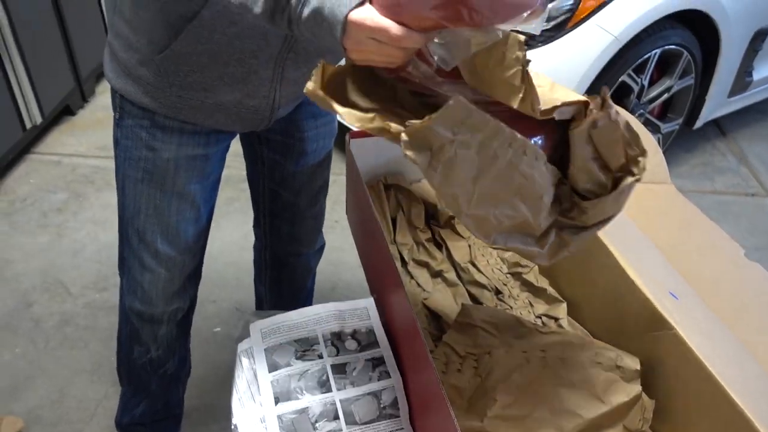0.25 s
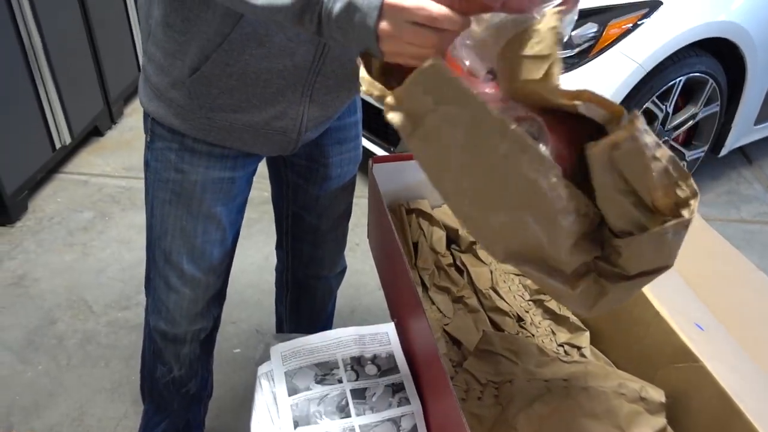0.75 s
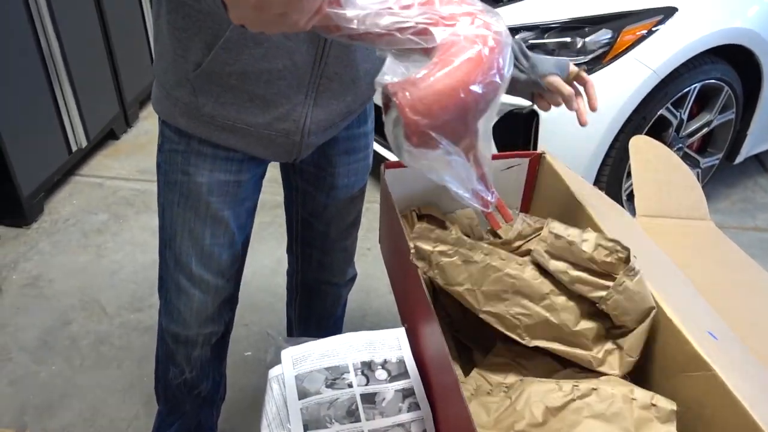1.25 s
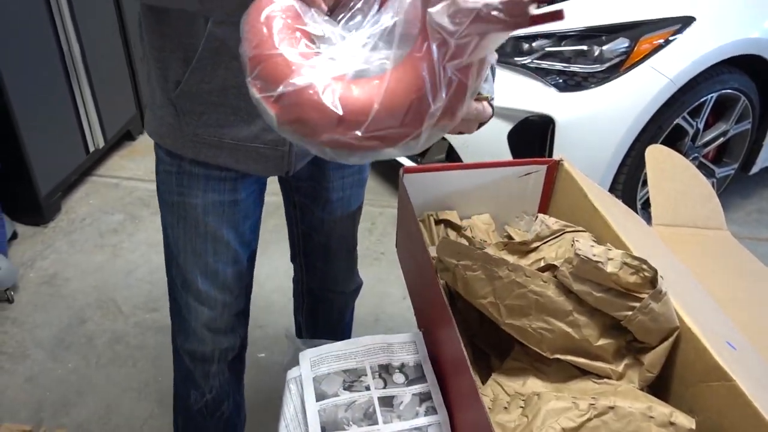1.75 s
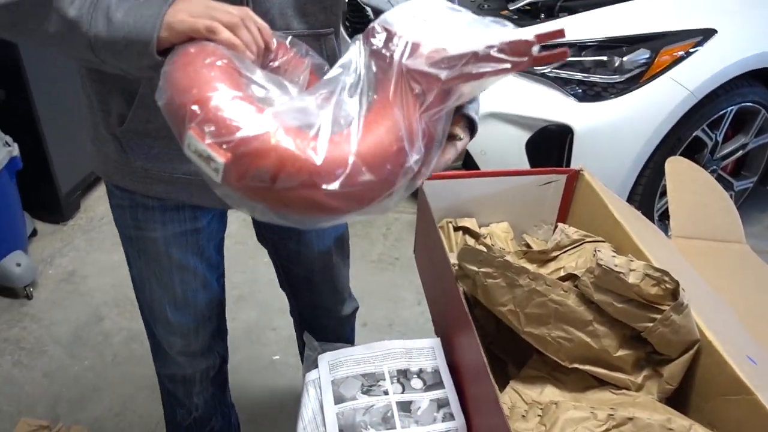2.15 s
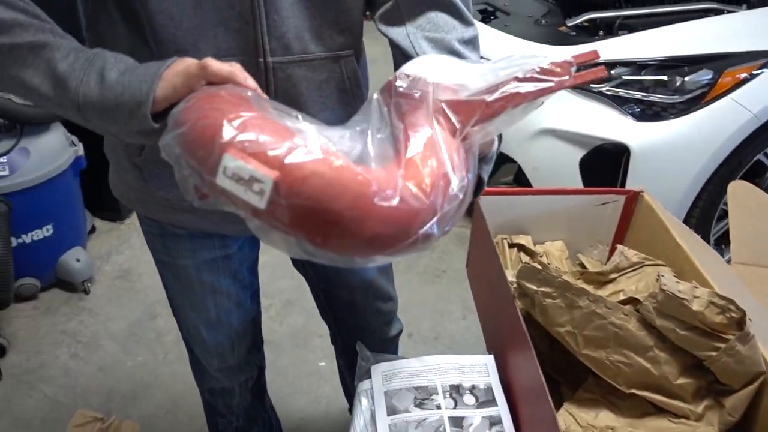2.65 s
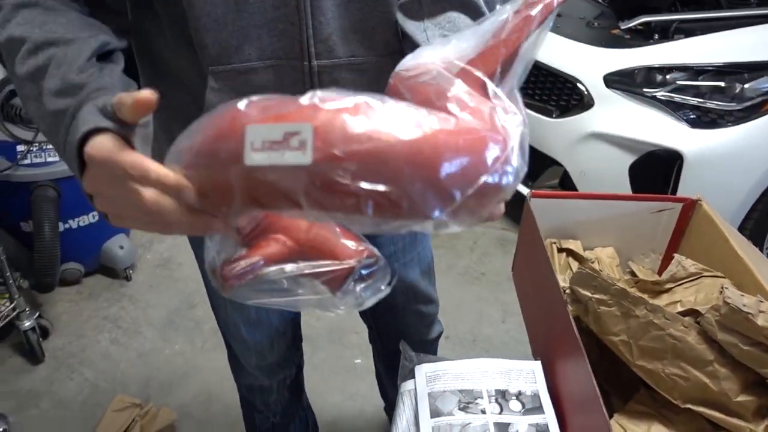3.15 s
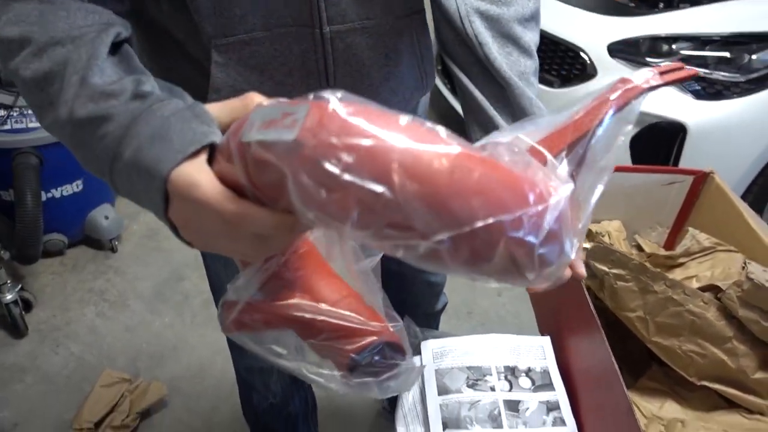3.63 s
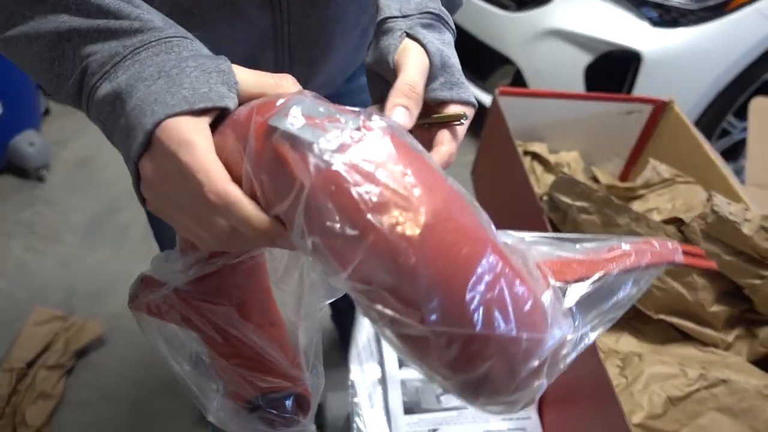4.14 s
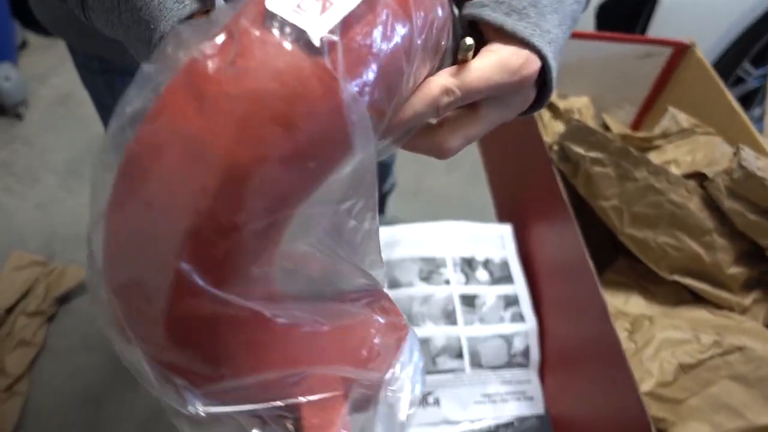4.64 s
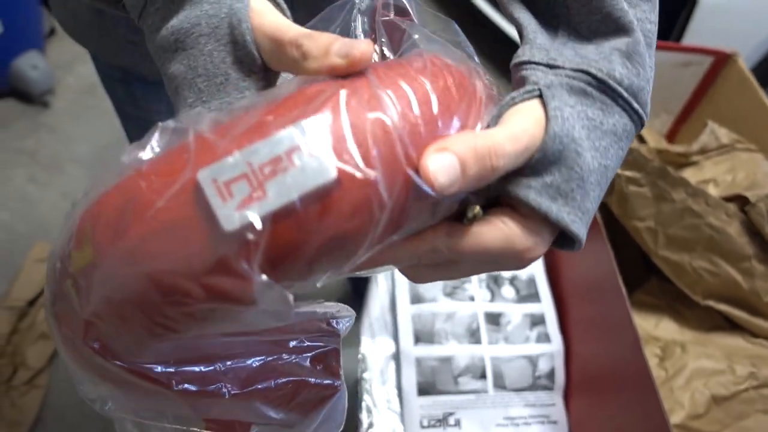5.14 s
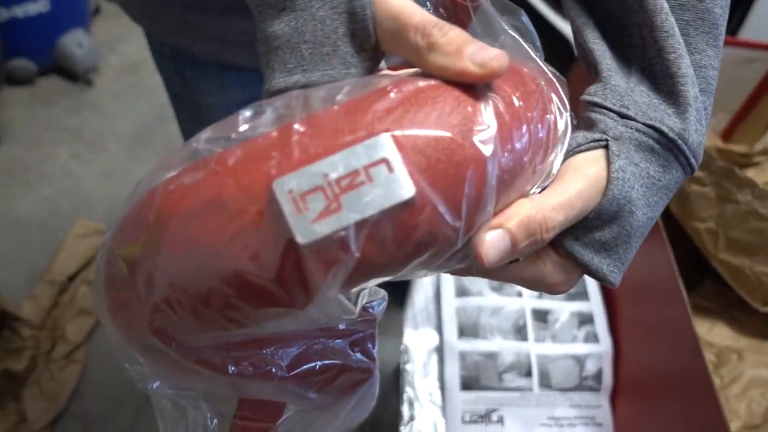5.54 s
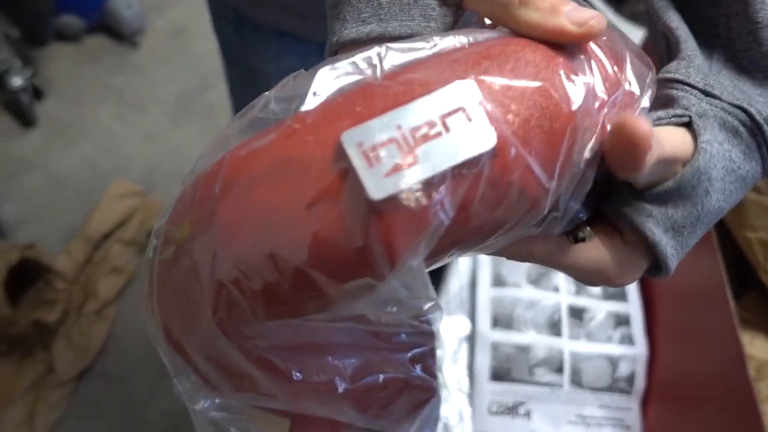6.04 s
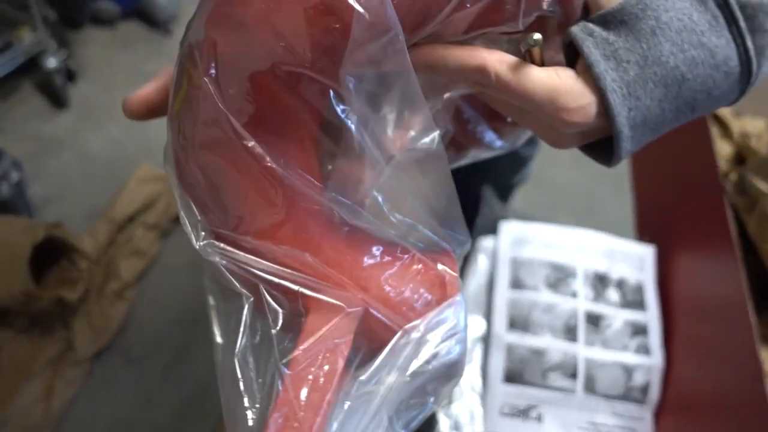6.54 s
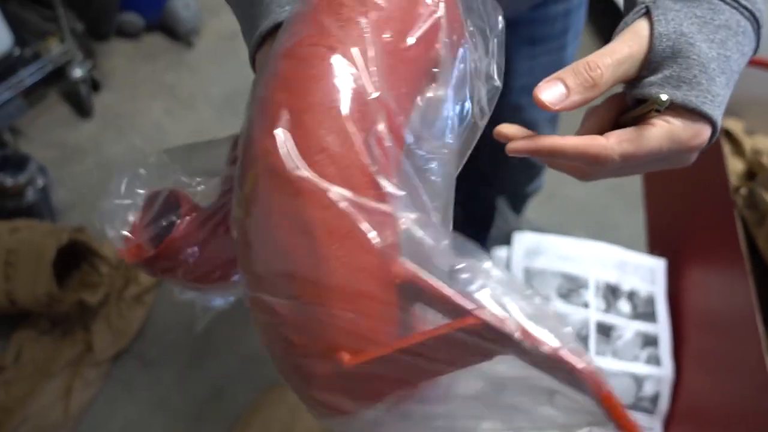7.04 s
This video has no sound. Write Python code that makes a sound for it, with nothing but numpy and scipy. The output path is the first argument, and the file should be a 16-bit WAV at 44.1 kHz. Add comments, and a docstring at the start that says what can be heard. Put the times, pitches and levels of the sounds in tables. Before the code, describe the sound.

Thick packing paper rustles loudly and drops into a cardboard box, then a thin plastic bag crinkles in bursts around a hollow pipe in a garage.

```python
"""In a concrete garage a hollow pipe in a plastic bag is pulled out of crumpled packing paper: creases buckle as short
resonant noise bursts over a dense crackle of random grains, and sheets slide as fluttering noise. The paper drops into
a cardboard box with soft thumps, pulses that ring a dull resonance. Then hands turn the bag over, with brighter snaps
and a few knocks of the pipe in the palm. Decaying noise echoes it all, and an appliance hums far off as narrow-band
noise in still air. Two close microphone ports hear it with small delays and a treble that differs between them."""
import sys
import numpy as np
from scipy import signal
from scipy.fft import rfft, irfft, next_fast_len
from scipy.io import wavfile

SR = 44100
rng = np.random.default_rng(int(sys.argv[2]) if len(sys.argv) > 2 else 0)


def volts_from_db(level):
    """Convert decibel levels to linear amplitude ratios."""
    exponent = np.asarray(level, float) / 20
    return 10 ** exponent


def dump_mix(stems):
    """Bounce the given channels to the path in sys.argv[1] as a 16-bit WAV at rate SR."""
    frames = np.atleast_2d(stems).T  # one column per channel
    limited = np.clip(frames, -1, 1)  # hard clip at full scale
    pcm = np.round(limited * 32767).astype(np.int16)
    wavfile.write(sys.argv[1], SR, pcm)


N = 321224

# spectrum of rustling sheets: f/Hz, relative density/dB per Hz
SHEET_SPECTRUM = [(50, -34), (110, -4.5), (330, -4.5), (570, -3.5), (900, -7.5), (2000, 2), (4200, 0),
                  (9000, -8), (16000, -8)]


def rms_one(x):
    """Normalisation: scale a signal to unit root mean square."""
    return x / np.sqrt(np.mean(x ** 2) + 1e-20)


def at_hz(points, hz):
    """Logarithmic pitch: read a spectrum table on a log-frequency axis."""
    p = np.array(points, float)
    return np.interp(np.log(hz + 1), np.log(p[:, 0] + 1), p[:, 1])


def colour(x, points):
    """Linear filtering: multiply the spectrum of steady noise by a spectrum table."""
    size = next_fast_len(N)
    gain = volts_from_db(at_hz(points, np.fft.rfftfreq(size, 1 / SR)))
    return irfft(rfft(x, size) * gain, size)[..., :N]


def resonate(x, hz, width_hz):
    """Damped resonance: a pole pair sets pitch and bandwidth, with gain about 1 at the peak."""
    r = np.exp(-np.pi * width_hz / SR)
    zeros = [(1 - r * r) / 2, 0, (r * r - 1) / 2]
    poles = [1, -2 * r * np.cos(2 * np.pi * hz / SR), r * r]
    return signal.lfilter(zeros, poles, x)


def dying(clicks, t60):
    """Exponential decay: each click starts an envelope that falls 60 dB in t60 seconds."""
    return signal.lfilter([1], [1, -volts_from_db(-60 / (max(t60, .001) * SR))], clicks + 1e-18)


def drift(rate_hz):
    """Low-passed chance: noise through two equal real poles at rate_hz, with unit rms."""
    r = np.exp(-40 * np.pi * rate_hz / SR)   # computed at every 20th sample
    slow = signal.lfilter([1], [1, -2 * r, r * r], rng.standard_normal(N // 20 + 2002))[2000:]
    return np.interp(np.arange(N) / 20, np.arange(len(slow)), rms_one(slow))


def ports(x, lag):
    """Arrival-time difference: sound from one side reaches one port lag samples before the other."""
    at = np.arange(len(x))
    return np.array([np.interp(at - lag / 2, at, x), np.interp(at + lag / 2, at, x)])


def diffuse(mid, side):
    """Diffuse-field coherence: the ports agree in the bass and part in the treble."""
    # difference of the two ports: f/Hz, side over mid/dB
    port_split = [(60, -35), (130, -33), (250, -22.5), (1000, -9.5), (4000, -2), (12000, -0.3)]
    side = colour(side, port_split)
    return np.array([mid + side, mid - side])


def handling():
    """Radiation of moved sheets: crackle and rub; slack paper booms in hollows, taut film is bright."""
    # treble of the sheet as it is held more or less taut: t/s, treble over rustle/dB
    taut = [(0.0, -5.5), (0.49, -5), (0.72, -7), (0.89, 0.5), (1.3, -0.5), (1.59, -6.5), (2.1, 2),
            (2.6, 0.5), (2.84, -4), (2.93, 5), (3.32, 3), (3.68, -5), (4.4, 0), (4.78, 0.5), (5.3, -3),
            (5.64, -1.5), (6.09, 1), (6.6, -0.5), (7.28, 0)]
    # air resonances of pipe and box: f/Hz, bandwidth/Hz, gain/dB
    hollows = [(246, 20, -4.5), (572, 88, -4), (1150, 450, -32)]
    # peaks of the four overlapping bands low, body, crisp and high: natural log of f/Hz
    band_pitches = np.log([700, 1700, 4500, 8000])
    slide_db = -4.0   # rubbing relative to crackle
    effort_db, boom_db, body_db = moves()
    taut_db = np.interp(np.arange(N) / SR, *np.transpose(taut))
    surge = yielding()
    sheet = crackle(effort_db, surge) + volts_from_db(slide_db) * slide(surge)

    size = next_fast_len(N)
    pitch = np.log(np.fft.rfftfreq(size, 1 / SR) + 1)
    spectrum = rfft(sheet, size)
    low, body, crisp, high = [irfft(spectrum * np.interp(pitch, band_pitches, share), size)[:, :N]
                              for share in np.eye(4)]
    low = low + sum(volts_from_db(db) * resonate(low, hz, width_hz) for hz, width_hz, db in hollows)

    rustle = rms_one(volts_from_db(body_db) * body + crisp)
    boom = volts_from_db(boom_db) * rms_one(low)
    treble = volts_from_db(taut_db) * rms_one(high)
    return volts_from_db(effort_db) * (rustle + boom + treble)


def moves():
    """Incoherent addition: movements add in power, so the strongest one sets the colour."""
    # hand movements that swell and fade, first in the paper, then on the bag:
    # t/s of the peak, rustle level/dB, rise/s per 20 dB, fade/s per 20 dB, boom over rustle/dB
    # (rise and fade are floored at 0.003 and 0.01 s)
    paper_moves = [(0.047, -26.5, -1, 0.14, -5.5), (0.19, -29.5, 0.8, 0.28, -5),
                   (0.214, -22.5, -0.03, 0.15, -4.5), (0.489, -28, .004, .2, -3.5),
                   (0.555, -28, -0.04, 0.24, -7), (0.6, -24.5, -0.04, 0.15, -2),
                   (0.68, -26, 0.02, 0.19, -5), (0.77, -29.5, 0.4, 0.31, -9), (0.85, -27, 0.03, .2, -4.5),
                   (0.92, -25.5, 0.21, 0.2956, -3.5), (1.165, -27, 0.07, 0.32, -2),
                   (1.41, -34.5, 0.5, 0.1142, -2.5), (1.54, -45, 0.5, -0.35, -1.5)]
    bag_moves = [(1.69, -55.5, .12, 0.37, 4), (1.854, -50, 0.18, .6, -3.5), (2.065, -48, 0.81, 0.11, -11),
                 (2.28, -46, 0.25, 0.19, -10), (2.405, -49.5, 0.073, 0.25, -7.5),
                 (2.538, -44.5, 0.079, 0.45, -12), (2.622, -39.5, 0.1, 0.16, -4.5),
                 (3.047, -37, .22, 0.43, -8.5), (3.195, -43, 0.44, 0.1, -7.5),
                 (3.375, -35, 0.14, 0.36, -10.5), (3.62, -49, 0.57, 0.23, -8),
                 (3.863, -50.5, 0.016, 0.035, -2.5), (4.152, -49, 0.0061, 0.082, -10),
                 (4.274, -54.5, 0.021, .45, 3.5), (4.42, -40, 0.15, 0.35, -12),
                 (4.564, -38.5, 0.29, 0.14, -9), (4.787, -36, 0.13, 0.28, -6.5),
                 (5.101, -40, 0.45, .3, -11.5), (5.339, -49, 0.82, 0.51, -5),
                 (5.572, -38.5, 0.16, 0.25, -8), (5.956, -58, .005, 0.059, -6),
                 (6.078, -37.5, 0.049, 0.087, -14), (6.15, -46, 0.083, 0.66, -8.5),
                 (6.29, -45.5, 0.32, .4, -7), (6.436, -33.5, 0.0087, 0.079, -1.5),
                 (6.51, -34.5, 0.13, 0.14, -9), (6.607, -34.5, 0.075, 0.37, -5),
                 (6.713, -33.5, 0.42, .3, -11.5), (6.81, -32.5, .35, 0.15, -11),
                 (7.041, -61, 0.24, 0.023, -33), (7.161, -51.5, 0.32, 0.92, -8.5)]
    paper_body_db, bag_body_db = 0.5, -2.5   # low-middle rustle: thick paper has more than thin film
    t = np.arange(0, N + 32, 32) / SR
    power, boom, body = 1e-12, 0, 0
    for rows, body_db in ((paper_moves, paper_body_db), (bag_moves, bag_body_db)):
        for s, db, rise, fade, boom_db in rows:
            fall_db = 20 * np.maximum((s - t) / max(rise, .003), (t - s) / max(fade, .01))
            part = volts_from_db(db - fall_db) ** 2
            power = power + part
            boom = boom + part * boom_db
            body = body + part * body_db
    curves = (10 * np.log10(power), boom / power, body / power)
    return [np.interp(np.arange(N) / SR, t, c) for c in curves]


def yielding():
    """Stick and release: folds give way suddenly and settle slowly; unit rms."""
    gives_per_s, settle_s = 35.0, .12
    gives = (rng.random(N) < gives_per_s / SR) * np.minimum(rng.exponential(1, N), 2)
    return rms_one(dying(gives, settle_s))


def crackle(effort_db, surge):
    """Random impulse process: small creases buckle, fused under hard work and lone under light."""
    creases_per_s = 800.0   # at an effort of -41.5 dB, before the surges
    per_s = creases_per_s * volts_from_db(.6 * (effort_db + 41.5))
    # the square root keeps the power steady as the creases grow denser
    sizes = volts_from_db(4.6 * np.minimum(rng.exponential(1, N), 2.5)) / np.sqrt(per_s)
    born = rng.random(N) < per_s * volts_from_db(3.5 * surge) / SR
    patch = rng.integers(0, 12, N)   # each patch of sheet has a pitch and a direction
    out = 0
    for k, hz in enumerate(np.geomspace(950, 13500, 12)):
        envelope = dying(sizes * born * (patch == k), .003 + 5 / hz)
        grains = envelope * rng.standard_normal(N)
        out = out + ports(resonate(grains, hz, .9 * hz), 1.3 * np.sin(k * 4))
    return rms_one(colour(out, SHEET_SPECTRUM))


def slide(surge):
    """Friction noise: sheets rub with a broad hiss whose level flutters."""
    mid, side = colour(rng.standard_normal((2, N)), SHEET_SPECTRUM)
    flutter_db = 1.6 * surge + 2.0 * drift(87.0)
    return rms_one(diffuse(mid, side) * volts_from_db(flutter_db))


def burst(noise, hz, t60, width=1.0):
    """Impulse excitation of a buckling crease: dying noise through two broad resonances, peak 1."""
    shape = noise * volts_from_db(-60 * np.arange(len(noise)) / (max(t60, .001) * SR))
    shape = resonate(shape, hz, width * hz)
    shape = resonate(shape, hz, 2 * width * hz)
    return shape / np.abs(shape).max()


def snaps():
    """Buckling instability: a sharp release, then a short rattle of the sheet; low ones rattle longer."""
    # creases that buckle audibly: t/s, peak level/dB before the ports, centre f/Hz
    buckles = [(0.008, -13, 3350), (0.021, -11, 2800), (0.0554, -9.5, 3800), (0.1606, -13.5, 3050),
               (0.1844, -18, 3150), (0.2099, -11, 2130), (0.2152, -11, 2630), (0.4892, -16, 3650),
               (0.5557, -14, 4350), (0.5999, -10.5, 2580), (0.628, -15.5, 2320), (0.669, -20.5, 2350),
               (0.6738, -14, 2030), (0.694, -13, 2570), (0.7289, -18, 2750), (0.7666, -17, 3150),
               (0.8392, -7.5, 5750), (0.8724, -17, 4450), (0.9363, -11, 5100), (0.9552, -8, 5550),
               (0.9684, -8, 5250), (1.001, -13, 5200), (1.6834, -26, 3300), (1.7311, -32, 3750),
               (1.8466, -22.5, 6600), (1.918, -19, 5700), (1.921, -18, 7750), (1.9692, -20, 6950),
               (1.9958, -21.5, 4950), (2.0032, -20, 3550), (2.0282, -17, 6950), (2.0525, -19, 5700),
               (2.124, -16.5, 6800), (2.1303, -19.5, 8700), (2.267, -24.5, 4330), (2.3182, -24.5, 4600),
               (2.5313, -25, 5150), (2.5664, -19, 6050), (2.6408, -20, 6900), (2.7, -26, 4450),
               (2.741, -30.5, 4650), (2.871, -26, 6250), (3.0181, -28.5, 6250), (3.1368, -16, 7550),
               (3.301, -19.5, 6350), (3.3562, -18.5, 6600), (3.4684, -15, 9450), (3.7665, -25.5, 4750),
               (3.8696, -30.5, 4100), (4.1522, -32, 3780), (4.3511, -27, 6300), (4.5335, -21, 5250),
               (4.5492, -16.5, 5100), (4.578, -19, 5450), (4.7484, -23, 4250), (4.7757, -12, 5500),
               (4.8328, -22, 4350), (4.8641, -20, 5850), (4.889, -14, 6460), (5.0028, -15, 5150),
               (5.0433, -22, 5050), (5.0763, -13, 5450), (5.099, -14, 6250), (5.1196, -15.5, 7600),
               (5.1373, -20, 7150), (5.146, -17, 4900), (5.177, -18, 7400), (5.216, -21, 7100),
               (5.2302, -19, 5950), (5.2676, -13, 7000), (5.285, -25, 2250), (5.3194, -20.5, 7600),
               (5.3958, -25, 6950), (5.4182, -25, 5350), (5.4313, -19, 10500), (5.4646, -24.5, 3650),
               (5.575, -14.5, 8650), (5.585, -13.5, 6500), (5.6154, -20.5, 4900), (5.6541, -19, 5650),
               (5.702, -22.5, 2770), (5.7128, -21, 8050), (5.787, -20, 6100), (5.8084, -32.5, 3450),
               (5.8841, -38, 4150), (5.9546, -34.5, 3200), (6.008, -35, 5370), (6.0404, -26.5, 3700),
               (6.0543, -25.5, 5450), (6.0642, -15, 6750), (6.1285, -16, 8250), (6.146, -13, 9250),
               (6.1536, -16, 5650), (6.1776, -21.5, 4950), (6.2576, -15.5, 6750), (6.283, -25, 6750),
               (6.2944, -19, 7350), (6.2978, -14, 5200), (6.3143, -7, 6400), (6.349, -19, 6050),
               (6.3835, -22.5, 4450), (6.4352, -16, 2650), (6.4484, -11, 5950), (6.5983, -6, 6100),
               (6.6215, -10.5, 7550), (6.6526, -12.5, 5000), (6.6733, -8.5, 7050), (6.695, -12, 4550),
               (6.7303, -8.5, 4680), (6.7428, -8, 4380), (6.7792, -20, 6150), (6.7865, -13, 4250),
               (6.8022, -13, 3330), (6.893, -16.5, 4460), (7.0022, -16.5, 5140), (7.0082, -27, 8450),
               (7.0434, -15, 3900), (7.0689, -8, 6270), (7.154, -28, 5450), (7.1922, -25.5, 5600),
               (7.2557, -40, 2950), (7.2784, -21.5, 7560)]
    out = np.zeros((2, N + 600))
    noise = rng.standard_normal((len(buckles), 601))
    for (s, db, hz), (side, *rattle) in zip(buckles, noise):
        release = np.arange(600) == 3
        strike = 0.42 * np.array(rattle) + 1.26 * release
        shape = burst(strike, hz, 0.006 + 8 / hz, width=1.1)
        # the body that holds the ports shades mainly the treble
        shade = .25 * np.tanh(side) * resonate(shape, 8000, 14000)
        heard = ports(shape, 0.88 * np.tanh(side)) + [shade, -shade]
        start = round(s * SR)
        out[:, start:start + 600] += volts_from_db(db) * heard
    return out[:, :N]


def thumps():
    """Forced oscillation: a soft 5 ms push rings a dull, heavily damped hollow."""
    # paper on the box, pipe in the palm: t/s, peak level/dB, f/Hz
    blows = [(0.496, -33, 269), (1.182, -24.5, 169), (1.337, -23.5, 205), (2.617, -47, 256),
             (3.101, -43, 118), (4.777, -39, 580), (6.432, -52, 153), (6.597, -35.5, 180)]
    out = np.zeros(N)
    for s, db, hz in blows:
        push = np.zeros(N)
        start = round(s * SR)
        push[start:start + 220] = np.hanning(220)
        ring = resonate(push + 1e-18, hz, 0.33 * hz)
        out += volts_from_db(db) * ring / np.abs(ring).max()
    return out


def garage(x):
    """Reverberation: dense echoes as noise that dies octave by octave, from the floor bounce on."""
    # reverberation time of the garage: f/Hz, T60/s
    room_t60 = [(100, 0.46), (1000, 1), (4000, 0.36), (12000, 0.14)]
    t = np.arange(SR) / SR
    tail = 0
    for hz in 90 * 2.0 ** np.arange(8):
        octave = signal.butter(2, [hz / np.sqrt(2), hz * np.sqrt(2)], "band", fs=SR, output="sos")
        t60 = np.interp(hz, *np.transpose(room_t60))
        tail = tail + signal.sosfilt(octave, rng.standard_normal((2, SR))) * volts_from_db(-60 * t / t60)
    tail = tail * (t > .005) / np.sqrt(np.sum(tail[0] ** 2))   # the bounce arrives after 5 ms
    mid, side = signal.oaconvolve(np.array([x, x]), tail, axes=1)[:, :N]
    return diffuse(mid, side)


def background():
    """Stationary noise: still air, and a far appliance as narrow bands whose level wavers."""
    # air of the garage: f/Hz, relative density/dB per Hz
    air_spectrum = [(18, -47), (30, 4.5), (124, 0.5), (415, -7), (584, -12), (666, -7.5), (1350, -49),
                    (1720, -9), (12300, -67), (16000, -69.5)]
    # wavering hum: f/Hz, bandwidth/Hz of each of two resonances, rms level/dB
    hum_bands = [(73.4, 8, -67), (123.3, 17, -63.5)]
    air_db = -60   # rms
    mid, side = colour(rng.standard_normal((2, N)), air_spectrum)
    air = rms_one(diffuse(mid, side))
    hum = 0
    for hz, width_hz, db in hum_bands:
        tone = resonate(resonate(rng.standard_normal(N), hz, width_hz), hz, width_hz)
        hum = hum + volts_from_db(db) * rms_one(tone)
    return volts_from_db(air_db) * air + hum


def scene():
    """Superposition: close sounds, their echo in the garage, and the background."""
    room_db = -10.5
    lean = volts_from_db([[-.3], [.3]])   # the hands work a little to the right
    near = (handling() + snaps()) * lean + thumps()
    return near + volts_from_db(room_db) * garage(near.mean(axis=0)) + background()


def band_limit(x):
    """A steep low-pass at the top of the band."""
    return signal.sosfilt(signal.butter(12, 16980, fs=SR, output="sos"), x)


def record(dry):
    """Band limiting: the microphone cuts the deep bass, the recorder the very top."""
    bass_cut = signal.butter(2, 60, "high", fs=SR, output="sos")
    top_cut = signal.cheby2(12, 40, 16100, fs=SR, output="sos")   # 40 dB down from 16.1 kHz
    mix = signal.sosfilt(top_cut, signal.sosfilt(bass_cut, dry))
    return band_limit(mix)


dry = scene()
out = record(dry)
dump_mix(out)
```